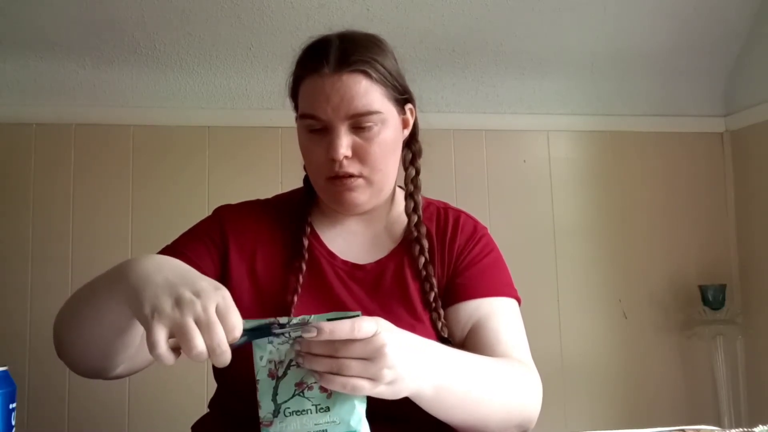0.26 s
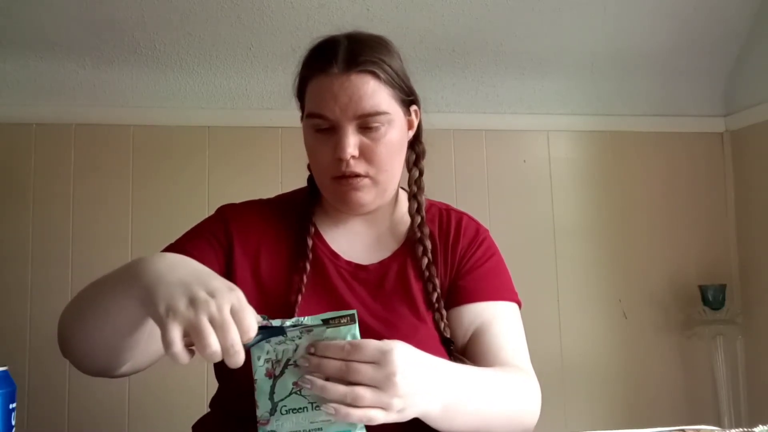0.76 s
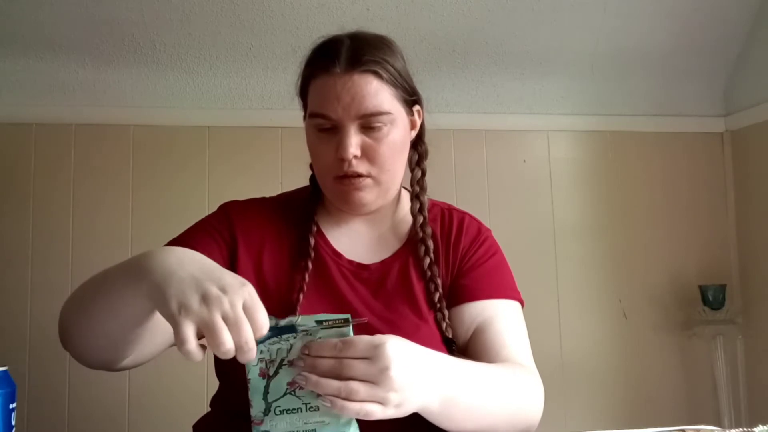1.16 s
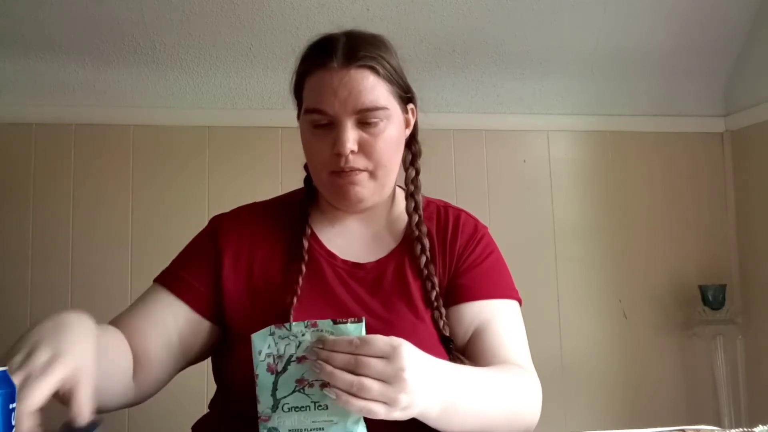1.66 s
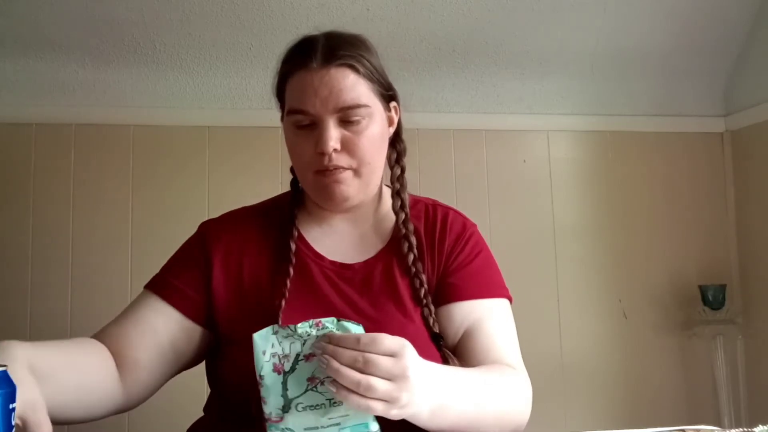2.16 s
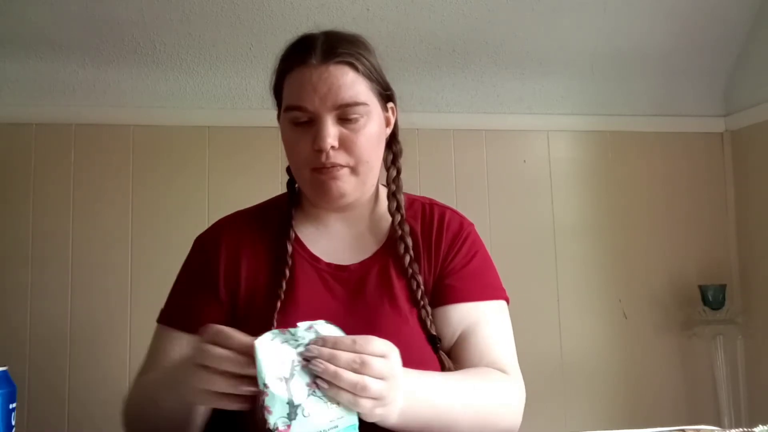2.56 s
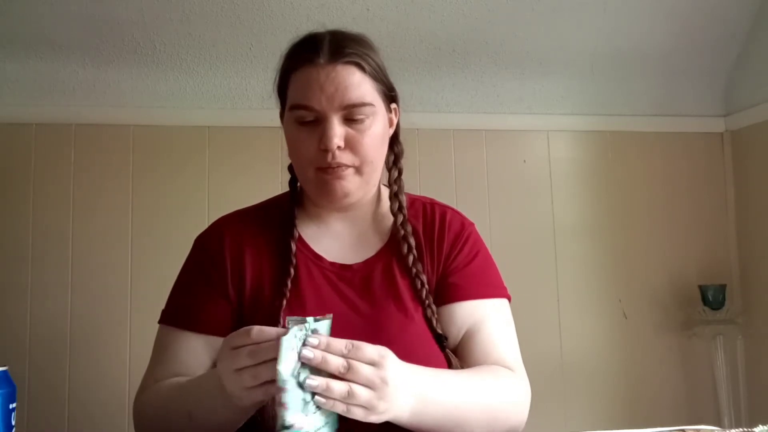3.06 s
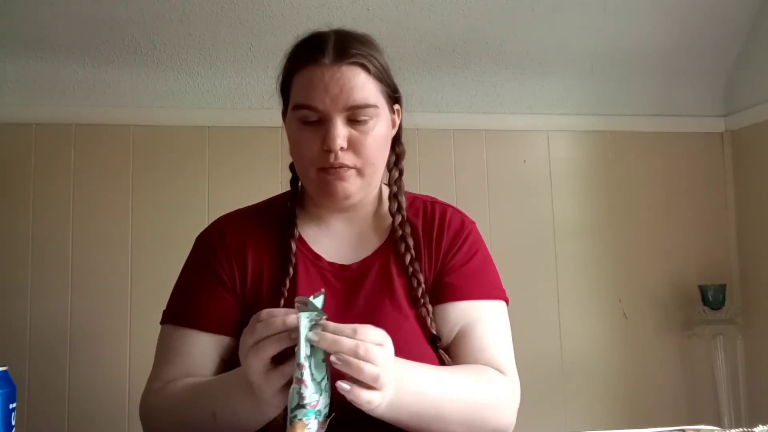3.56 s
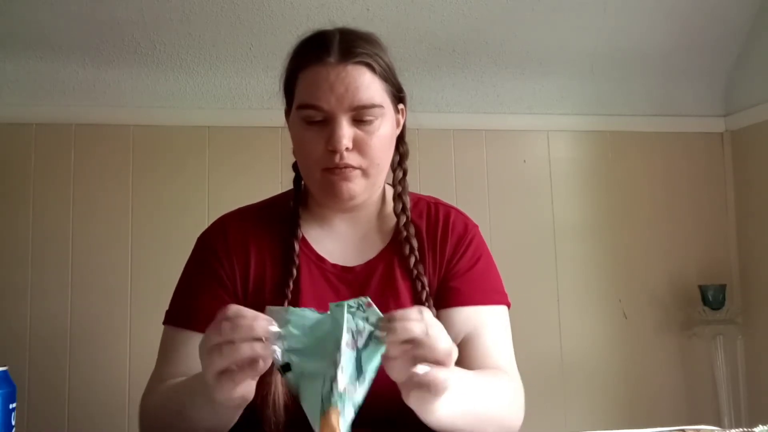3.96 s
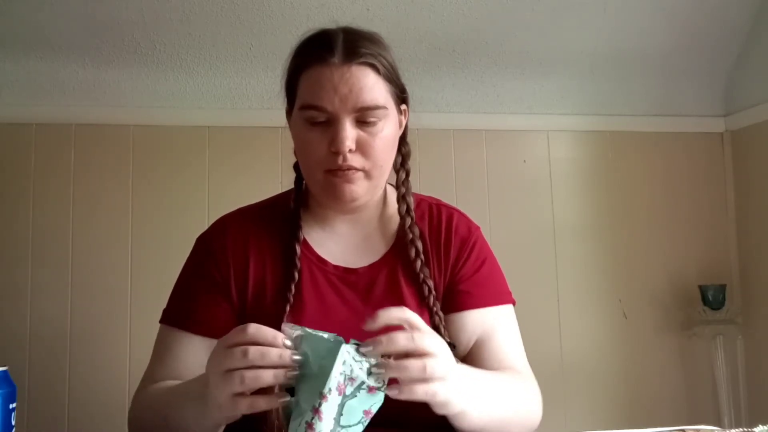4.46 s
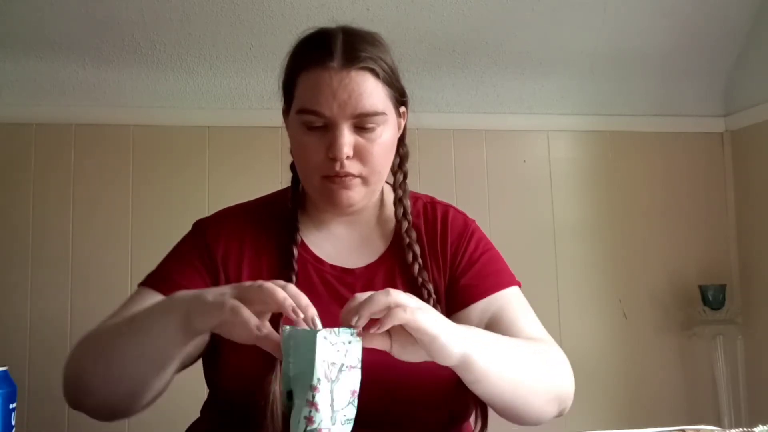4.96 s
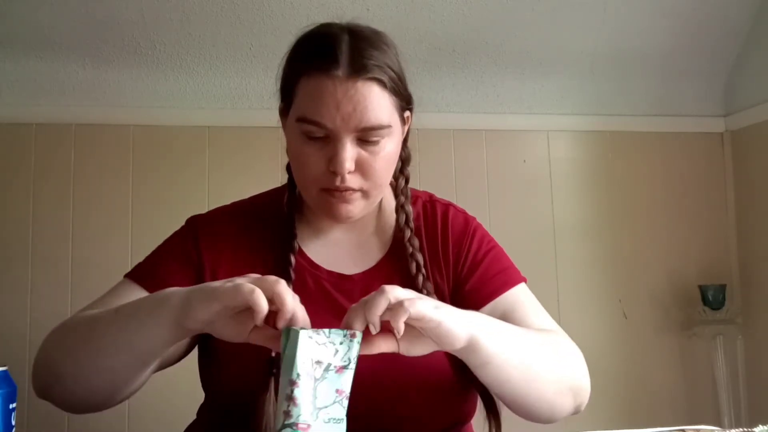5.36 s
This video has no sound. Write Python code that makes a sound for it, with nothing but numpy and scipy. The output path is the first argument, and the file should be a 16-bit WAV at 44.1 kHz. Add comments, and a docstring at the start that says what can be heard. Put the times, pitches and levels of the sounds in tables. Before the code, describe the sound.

Close stereo pickup of a crisp snack-type pouch being opened at a table. First come scattered dry snaps and fine rustle from cutting, then a dull thump and rattle as scissors land and settle. Bright crinkling follows, strongest around four seconds, easing, then picking up again in sharp snaps with hollow little pops. Short dense room reflections and a nearly silent steady noise floor.

```python
"""A stiff plastic pouch is snipped open and pulled apart in short squeezes; in between, scissors land on a table.
Creases in the film buckle in loud snaps over a crackle of tiny ones: filtered noise bursts, each with a hollow pop.
The scissors are a knock, made of fading sine waves, and a clack of the blades, made of short noise.
A small room answers with dense echoes, over faint steady air noise.
"""
import sys
import numpy as np
from scipy import signal
from scipy.fft import rfft, irfft
from scipy.io import wavfile
from scipy.ndimage import uniform_filter1d

SR = 44100
rng = np.random.default_rng(int(sys.argv[2]) if len(sys.argv) > 2 else 0)


def to_wav(s):
    """Save 16-bit WAV."""
    ch = np.atleast_2d(s).T  # columns
    pcm = np.round(np.clip(ch, -1, 1) * 32767)  # PCM
    wavfile.write(sys.argv[1], SR, pcm.astype(np.int16))


N = 247401  # length in samples
SNAP_SIZE = 2048  # samples in one snap or pop
SNAP_S = 0.003  # reference length that turns a level into the energy of a click, s
EARLY_S = 0.0015  # each burst is placed this much early, so that its sharp step falls on time, s

# Loud creases, one row a snap. Levels are before the common offsets in snaps().
# Columns: t/s, level/dB, centre of the ring f/Hz, push on the pouch relative to the snap level/dB,
# left minus right level/dB (limited to 10 either way)
CREASE_SNAPS = [(0.227, -32, 3550, -9, 0), (0.2523, -36.5, 4800, -6.5, 5), (0.3511, -35.5, 4470, -30, -1),
                (0.3926, -30, 4050, -1, 2), (0.3967, -31, 4230, -5, -5), (0.4083, -33, 5470, -22, -5),
                (0.547, -60, 2120, -2, 1), (0.6164, -31.5, 2300, -23, 3.5), (0.6376, -33.5, 1730, -6, -3),
                (0.7182, -35.5, 2340, 1.5, 4), (0.76, -30, 3280, -8.5, 10), (0.8027, -38, 2750, 3.5, 4),
                (0.9676, -30, 5250, -16.5, 0.5), (1.028, -40.5, 2940, 1, 1), (1.119, -25, 4800, -5, -3),
                (1.131, -40, 3890, 3.5, -3), (1.1437, -29, 3600, -2, 4), (1.1485, -23, 4630, -39, 4),
                (1.2216, -29, 5500, -23, 1), (1.372, -44, 5500, 6, 0), (1.392, -26.5, 4600, -29, 5.5),
                (1.427, -38.5, 4100, -22, 3), (1.5878, -46, 7600, -34, 3), (1.6532, -36, 4680, -9, 12),
                (1.7047, -38, 3950, -7, -1), (1.7255, -35.5, 4900, -5, -3), (1.7468, -24.5, 4870, -12, 1),
                (1.7643, -26.5, 5200, -32, -3), (1.815, -28.5, 6100, -32, -4), (1.8304, -29, 4770, -20, 4),
                (1.85, -28, 3100, -31, 6), (1.967, -34, 4460, 0, -3), (1.9781, -25, 3640, -7, 0),
                (2.0016, -27.5, 3420, -26, 4), (2.014, -29.5, 3330, -18, -4), (2.127, -38, 6200, -32, -11),
                (2.4678, -49, 11000, -27, 8), (2.476, -25, 6460, -23, -13), (2.637, -30.5, 2680, -10, -8),
                (2.6414, -25.5, 2750, -9.5, 8), (2.6686, -30.5, 5500, -3, 3),
                (2.6859, -22.5, 5650, -16, -7), (2.7347, -30.5, 4380, -10, -4),
                (2.7526, -27, 5470, -26, -2), (2.83, -28.5, 4940, -6.5, 4), (2.8607, -34, 5860, -1, -6),
                (2.8844, -34, 3400, -7, -6), (2.9237, -54, 4030, -10, 3), (2.956, -32.5, 4760, -27, -8),
                (3.0215, -31, 4580, -1.5, 4), (3.0444, -26, 5570, -11.5, 5), (3.0674, -30, 6600, -17, 4),
                (3.077, -24.5, 4230, -20, 2), (3.1177, -26.5, 5300, -6, -13), (3.1584, -30, 4600, -8, 1),
                (3.2528, -36, 4140, 0, 6), (3.293, -25.5, 6500, -27, 2), (3.3969, -24, 4500, -35, -14),
                (3.42, -23, 4600, -6, -6), (3.53, -27.5, 8250, -22, -9), (3.538, -21.5, 4900, -37, 1.5),
                (3.6423, -26, 5870, -8, 2), (3.6729, -26, 7900, -25, 2), (3.6949, -22.5, 4900, -27, -2),
                (3.7217, -22.5, 5230, -6.5, 4), (3.747, -21, 5100, -32, 6), (3.7693, -25, 4900, -16, -4),
                (3.799, -26.5, 6800, -25, 2), (3.8322, -25.5, 4700, -18, 4), (3.885, -24.5, 5070, -36, -6),
                (3.9, -31, 4270, -15, 8), (3.9234, -21, 4560, -11.5, -3), (3.9388, -19, 5100, -19, -5),
                (3.974, -21.5, 4900, -2.5, -13), (3.987, -20.5, 5650, -12, 10),
                (4.0259, -25.5, 3920, -11, 1), (4.042, -24.5, 5140, -29, 3), (4.0809, -27, 5250, -11, -14),
                (4.1388, -29.5, 3780, -26, -13), (4.2195, -30.5, 4360, -4, -3),
                (4.2955, -33, 4900, -22, -4), (4.327, -23, 3680, -5.5, 4), (4.3863, -32.5, 3220, -17, 0),
                (4.4042, -28, 7400, -2.5, 4), (4.421, -25, 5450, -10.5, -2), (4.448, -20, 3650, -22, 11),
                (4.4636, -29, 3600, -1.5, 1), (4.5858, -41, 2000, -24, 1), (4.6347, -31, 3870, -3.5, 4),
                (4.686, -40, 4870, -7, -1), (4.7238, -36, 3380, 0, 1), (4.7309, -32.5, 2500, -1.5, 4),
                (4.7819, -29.5, 2770, -6.5, -2), (4.815, -31.5, 4900, -6, -8),
                (4.8213, -21, 4460, -2.5, -3.5), (4.8417, -28.5, 5350, -4, 7), (4.873, -27.5, 3170, 1.5, 0),
                (4.942, -29.5, 2140, -1.5, -6), (4.946, -29, 4600, -3.5, 7), (4.971, -23, 3770, -16, -7),
                (4.992, -26.5, 3840, -21, 5), (5.0191, -31.5, 5160, -2, 9), (5.075, -29.5, 4450, 0.5, 0),
                (5.086, -25, 4760, -20, -15), (5.2034, -31.5, 3180, -9, -1), (5.228, -32, 6900, -16, 14),
                (5.2848, -31.5, 1900, 0, 1), (5.3279, -24.5, 6200, -4.5, -1), (5.376, -20.5, 3650, -2.5, 3),
                (5.39, -27, 4700, -30, -9), (5.4584, -24, 3700, -15, -6), (5.4691, -22, 3950, -6, 13),
                (5.5229, -25, 4270, -17, 9), (5.5363, -33, 3550, -20, 2), (5.5513, -19.5, 2480, -4.5, 0),
                (5.5846, -21, 2390, -16, 2), (5.59, -28.5, 3040, -1, -14)]


def snaps(film_db=1, body_db=-1.5, spread_db=-2.5, beam_db=4, ripple=0.12, pull=0.61,
          typical_hz=4200, wide_growth=0.15, typical_db=-24):
    """Loud creases one by one: what goes straight to the two ports, and what spreads to the walls."""
    straight, spread = np.zeros((2, 2, N))
    for s, db, ring_hz, push_db, pan_db in CREASE_SNAPS:
        strength = amp(db) * np.sqrt(SNAP_S * SR)
        half_pan = np.array([[0.5], [-0.5]])
        sides = unit(amp(np.clip(pan_db, -10, 10) * half_pan))
        # high-pitched facets beam their sound forward
        octaves_up = np.log2(ring_hz / typical_hz)
        beam = amp(film_db + beam_db * max(octaves_up, 0))
        add(straight, s - EARLY_S, strength * beam * sides * crease(ring_hz))

        # weaker snaps sound drier: their film sound sends relatively less to the room
        wide = amp(spread_db + wide_growth * min(db - typical_db, 0))
        # summed over all directions, the colour of a facet evens out
        wide_hz = typical_hz * (ring_hz / typical_hz) ** pull
        add(spread, s - EARLY_S, strength * wide * crease(wide_hz, ripple))

        pop = strength * amp(push_db + body_db) * push()
        add(straight, s, pop)
        add(spread, s, pop)
    return straight, spread


# Basic colour of a buckling crease.
# Columns: f/Hz, level/dB
FILM_COLOUR = [(300, -54), (800, -6.5), (1300, -2.5), (2000, -1), (3400, -5), (4800, -6.5), (6400, -3.5),
               (7200, -7), (8200, -11.5), (10500, -10), (13500, -17.5), (15000, -9.5), (15800, -12),
               (16800, -60)]
SCATTER_S, FLUTTER = 0.0009, 0.45  # fade of the first waves in s; strength of the later ones


def crease(ring_hz, ripple=1, scatter=1.48, flutter_s=0.0096, rise=0.68, rise_s=0.0012, focus_db=5,
           lean_db=3.0, facet_db=4.5, peak_db=3.0, size=66):
    """A brief rise of noise softens the attack, then a sharp step and fading noise, different at each port."""
    t = (np.arange(SNAP_SIZE) - size) / SR  # the step comes after "size" samples
    hz = np.fft.rfftfreq(SNAP_SIZE, 1 / SR)
    before, early, late = rng.standard_normal((3, 2, SNAP_SIZE))
    waves = rise * unit(before * (t < 0) * np.exp(-abs(t) / rise_s))
    waves += scatter * unit(early * (t >= 0) * np.exp(-abs(t) / SCATTER_S))
    waves += FLUTTER * unit(late * (t >= 0) * np.exp(-abs(t) / flutter_s))
    # every facet has its own size, and so its own broad resonances
    facet = np.interp(hz, np.linspace(0, SR / 2, 32), rng.standard_normal(32))
    octaves = np.log2((hz + 1) / ring_hz)
    focus = np.hypot(octaves, 0.4)
    peak = np.exp(-(octaves / 0.22) ** 2)
    # small facets lean to the treble, large ones to the mids
    lean = np.log2(ring_hz / 4400) * np.log2(np.maximum(hz, 1200) / 4400)
    gain_db = read(FILM_COLOUR, hz) - focus_db * focus + lean_db * lean
    gain_db = gain_db + ripple * (facet_db * facet + peak_db * peak)
    step = t == 0
    return unit(colour(step + ripple * waves, gain_db))


# Colour of the hollow pouch.
# Columns: f/Hz, level/dB
POUCH_COLOUR = [(30, -43), (85, -14.5), (120, -6.5), (165, -7), (215, -4), (290, -2.5), (420, 4.5),
                (560, 3), (670, 6), (800, -0.5), (1100, 2), (1600, -2.5), (4000, -75)]


def push(ring_s=0.0037, shake=1.2):
    """The wall of the pouch jumps with the crease, inwards or outwards: a short hollow pop."""
    t, hz = np.arange(SNAP_SIZE) / SR, np.fft.rfftfreq(SNAP_SIZE, 1 / SR)
    shaking = unit(rng.standard_normal(SNAP_SIZE) * np.exp(-t / ring_s))
    wall = (t == 0) + shake * shaking
    return rng.choice([-1, 1]) * unit(colour(wall, read(POUCH_COLOUR, hz)))


LEAD_S = 0.002  # time scale of the short noisy swell that leads into each snap, s


def crackle(film_db=0, body_db=0, per_s=300, usual_db=-40.0, rate_growth=0.33, spread_db=4.0, chain_db=-16,
            chain_push_db=-10, chain_growth=0.089, typical_db=-23, chain_s=0.009, count=96):
    """Swarms of tiny creases of very unequal size: harder work brings more, and so does every loud snap."""
    film_power, wall_power = effort()
    # a short noisy swell leads into each snap and a crackle fades after it, fainter around weak snaps
    chain, near = np.zeros((1, N)), np.arange(-SR // 50, SR // 20) / SR
    for at, db, *_ in CREASE_SNAPS:
        strength = amp(db + chain_db + chain_growth * (db - typical_db))
        fade_s = np.where(near < 0, LEAD_S, chain_s)
        add(chain, at + near[0], strength ** 2 * np.exp(-abs(near) / fade_s))
    work = np.sqrt(film_power + chain[0])
    wall_work = np.sqrt(wall_power + chain[0] * amp(chain_push_db) ** 2)
    hollow = amp(body_db) * wall_work / work

    rate = per_s * (work / amp(usual_db)) ** rate_growth  # tiny creases a second
    happens = rng.random(N) < rate / SR
    size = happens * amp(spread_db * np.minimum(rng.exponential(1, N), 4))
    # the creases share out the work of each moment
    local_power = abs(uniform_filter1d(size ** 2, size=1500))
    size *= work / np.sqrt(local_power + rate / SR * 0.089)

    # folds of all sizes give way side by side
    kind = rng.integers(0, count, N)
    folds = [(crease(hz, scatter=1.46, facet_db=3.5), push()) for hz in np.geomspace(2000, 6500, count)]
    out = np.zeros((2, N))
    for i in np.flatnonzero(size):
        film, wall = folds[kind[i]]
        add(out, i / SR - EARLY_S, size[i] * (amp(film_db) * film + hollow[i] * wall))
    return out


# Squeezes of the film by blades or fingers, one row each.
# Columns: start t/s, held for t/s, starting strength of the fine crackle level/dB,
# push on the pouch relative to that level/dB
FILM_SQUEEZES = [(0.0, 0.26, -49.5, -10.5), (0.167, 0.087, -41, -12), (0.344, 0.069, -44.5, -6),
                 (0.391, 0.05, -49.5, 0.5), (0.661, 0.1, -43.5, -6), (0.791, 0.039, -50.5, -3),
                 (0.856, 0.071, -43, -5), (0.98, 0.13, -51.5, -11), (1.15, 0.051, -43, -8),
                 (1.21, 0.045, -40.5, -4), (1.29, 0.18, -53, -1.5), (1.383, 0.054, -46.5, -1),
                 (1.597, 0.15, -55, -7), (1.651, 0.12, -54.5, 1), (1.748, 0.15, -53.5, 7),
                 (1.976, 0.024, -49.5, 7), (2.498, 0.038, -41, -11), (2.635, 0.17, -38, -6),
                 (2.79, 0.1, -40.5, -8.5), (2.88, 0.2, -43, -6), (3.019, 0.15, -37, -10.5),
                 (3.199, 0.19, -41.5, -12), (3.402, 0.052, -36.5, -6), (3.546, 0.11, -40, -7.5),
                 (3.69, 0.079, -30, -17), (3.78, 0.082, -36, -16), (3.89, 0.084, -27, -21.5),
                 (3.942, 0.032, -27.5, -8), (4.008, 0.1, -40, -2.5), (4.329, 0.029, -38, -6),
                 (4.425, 0.016, -34.5, -2.5), (4.644, 0.095, -53, 0), (4.829, 0.052, -39, -5.5),
                 (4.953, 0.021, -32, -1.5), (5.0, 0.029, -37, -20), (5.072, 0.046, -37, -13),
                 (5.186, 0.058, -45, -6.5), (5.326, 0.092, -37, -12), (5.46, 0.063, -34, -7),
                 (5.549, 0.029, -36, -3)]
# a squeeze takes hold quickly, eases a little all along, and lets go
GRIP_S, EASE_DB_PER_S, LET_GO_S = 0.0057, 9, 0.01
# the film never lies quite still: steady crackle strength in dB, and its push relative to that in dB
HELD_DB, HELD_PUSH_DB = -68, 2.5


def effort():
    """Power of the fine crackle, and of its push on the pouch: each squeeze is attack, hold and release."""
    t = np.arange(N) / SR
    film = np.full(N, amp(HELD_DB) ** 2)
    wall = np.full(N, amp(HELD_DB + HELD_PUSH_DB) ** 2)
    for start, held, db, push_db in FILM_SQUEEZES:
        age = np.maximum(t - start, 0)
        attack = np.minimum(age / GRIP_S, 1)
        release = np.exp(-np.maximum(age - held, 0) / LET_GO_S)
        power = (attack * release * amp(db - EASE_DB_PER_S * age)) ** 2
        film = film + power
        wall = wall + power * amp(push_db) ** 2
    return film, wall


# The scissors land on the table, slip and settle: one row a knock, also used by blades().
# Columns: t/s, level/dB, centre of the blow f/Hz, clack of the blades relative to the knock level/dB
# (before the offset in blades()), centre of the clack f/Hz
SCISSOR_KNOCKS = [(2.1707, -23, 186, -15, 7500), (2.1715, -37, 1560, 0, 1960), (2.188, -27, 255, -31, 7000),
                  (2.2213, -31, 212, -3, 4260), (2.2679, -34, 215, -1.5, 1940),
                  (2.289, -55, 800, 19.5, 2250), (2.3139, -36, 197, -4.5, 4600),
                  (2.3359, -30, 760, 2.5, 5100), (2.349, -27, 264, -24, 5000), (2.391, -36, 175, -9, 3980),
                  (2.4133, -42, 200, 3, 3500)]
# Ringing modes of the table top, before each knock varies them a little.
# Columns: f/Hz, level/dB, time to fade by 60 dB t/s
TABLE_MODES = [(106.8, 3, 0.48), (148, -0.5, 0.2), (168, 5.5, 0.096), (233, -3, 0.17), (280, -1.5, 0.075),
               (332, 1, 0.062), (483.7, 4, 0.081), (566, -5, 0.15), (717, 9.5, .12), (837, 4.5, 0.13),
               (920, 2, 0.11), (1120, -3.5, 0.1), (1345, 7, 0.089), (1740, 4, 0.11), (1947, 8.5, 0.096)]


def scissors(level_db=0, reach_db=10, lowest_hz=105, spot_db=4.0, detune=0.0364):
    """The handles knock on the table: sine modes ring and fade, loudest near the pitch of the blow."""
    out, t = np.zeros((2, N)), np.arange(SR // 2) / SR
    hz, mode_db, t60 = np.transpose(TABLE_MODES)[:, :, None]
    facing = (-1) ** np.arange(len(hz))[:, None]  # neighbouring modes swing in opposite senses
    for s, db, blow_hz, *_ in SCISSOR_KNOCKS:
        # each knock lands on another spot and loads the top differently
        spot, load = rng.standard_normal((2, len(hz), 1))
        distance = abs(np.log2(hz / blow_hz))  # octaves from the blow
        weight = facing * amp(mode_db + spot_db * spot - reach_db * distance)
        weight = weight / np.linalg.norm(weight)
        tones = np.sin(2 * np.pi * hz * (1 + detune * load) * t)
        ring = (weight * amp(-60 * t / t60) * tones).sum(0)
        add(out, s, amp(db + level_db) * ring)
    # the table top radiates almost no deep bass
    highpass = signal.butter(N=2, Wn=lowest_hz, btype="highpass", fs=SR, output="sos")
    return signal.sosfilt(highpass.repeat(2, 0), out)  # every stage runs twice, for a steeper cut


def blades(level_db=-2, clack_s=0.002, focus_db=9, zing_db=-12, zing_s=0.02):
    """At each knock the loose blades clack, and the steel rings on briefly: two fading noises, filtered."""
    out, t, hz = np.zeros((2, N)), np.arange(SR // 4) / SR, np.fft.rfftfreq(SR // 4, 1 / SR)
    for s, db, _, clack_db, clack_hz in SCISSOR_KNOCKS:
        contact, steel = rng.standard_normal((2, 2, len(t)))
        clack = unit(contact * np.exp(-t / clack_s))
        clack = clack + amp(zing_db) * unit(steel * np.exp(-t / zing_s))
        octaves = np.log2((hz + 1) / clack_hz)
        clack = unit(colour(clack, -focus_db * octaves ** 2 / np.hypot(octaves, 0.5)))
        add(out, s, amp(db + clack_db + level_db) * np.sqrt(SNAP_S * SR) * clack)
    return out


def room(x, turn_s=0.035, count=4):
    """The sound fades in turn between four random echo patterns, so no fixed colour lasts."""
    place, out = np.arange(N) / SR / turn_s, np.zeros((2, N))
    for k in range(count):
        distance = abs((place - k + 1) % count - 1)
        share = np.cos(np.pi / 2 * np.minimum(distance, 1))
        sent = share * (x.mean(0) + x) / 2
        out += signal.oaconvolve(sent, echoes(), axes=1)[:, :N]
    return out


# How fast the echoes die. Columns: f/Hz, time to fade by 60 dB t/s
ECHO_FADE = [(150, 0.25), (500, 0.24), (1400, 0.32), (4000, 0.24), (7000, 0.19), (14000, 0.22)]
# How strongly the room answers. Columns: f/Hz, level/dB
ECHO_LEVEL = [(150, 6.5), (600, -0.86), (2500, 0.7), (6000, 3), (14000, 5)]
# How alike the echoes are on the left and right. Columns: f/Hz, likeness (1 same, 0 unrelated, below 0 opposed)
ECHO_LIKENESS = [(150, 0.64), (500, 0.86), (1000, 0.11), (2000, 0.38), (4000, 0.27), (16000, -0.3)]
FIRST_ECHO_S = 0.0058  # delay before the echoes begin to build up, s


def echoes(build_s=0.00052):
    """Dense random wall echoes, most alike at both ports in the bass, each band dying at its own speed."""
    time = np.arange(SR // 2) / SR
    taps = rng.standard_normal((2, len(time))) * (rng.random((2, len(time))) < 0.12)
    taps *= 1 - np.exp(-np.maximum(time - FIRST_ECHO_S, 0) / build_s)
    hz, t, (a, b) = signal.stft(taps / taps.std(), SR, nperseg=256)
    same = np.clip(read(ECHO_LIKENESS, hz), -1, 1)[:, None]
    t60 = read(ECHO_FADE, hz)[:, None]
    fade_db = read(ECHO_LEVEL, hz)[:, None] - 60 * (t - FIRST_ECHO_S - build_s) / t60
    # the last factor gives slow and fast fades the same energy
    decay = amp(fade_db) * np.sqrt(np.log(10 ** 6) / (t60 * SR))
    right = same * a + np.sqrt(1 - same ** 2) * b
    return signal.istft(np.array([a, right]) * decay, SR, nperseg=256)[1]


# Colour of the background air, before its overall level is set.
# Columns: f/Hz, level/dB
AIR_COLOUR = [(25, -1), (120, -1), (400, -10), (1200, -25), (3000, -12.5), (8000, -43), (16000, -44)]


def air(level_db=-64):
    """Faint steady background of the room: filtered noise, partly shared by left and right."""
    noise = rng.standard_normal((2, N)) + rng.standard_normal(N)
    gain = amp(read(AIR_COLOUR, np.fft.rfftfreq(N, 1 / SR)))
    shaped = irfft(rfft(noise) * gain, N)
    return amp(level_db) * np.sqrt(N) * unit(shaped)


# Where the noise suppressor is half closed.
# Columns: f/Hz, level in one bin level/dB
QUIET_LEVEL = [(100, -52), (500, -65), (2000, -69), (6000, -84), (9000, -74.5), (16000, -66.5)]


def suppress(x, depth_db=-9):
    """Noise suppressor: bands that fall near silence are turned down, which shortens the tails."""
    hz, _, z = signal.stft(x, SR, nperseg=512, noverlap=384)
    power = (abs(z) ** 2).mean(0)
    power = uniform_filter1d(power, size=5, axis=0)  # smooth over frequency
    power = abs(uniform_filter1d(power, size=3, axis=1))  # smooth over time
    opened = power / (power + amp(read(QUIET_LEVEL, hz))[:, None] ** 2)
    return signal.istft(z * amp(depth_db * (1 - opened)), SR, nperseg=512, noverlap=384)[1][:, :N]


def amp(db):
    """Decibels to gain."""
    return 10 ** (np.asarray(db) / 20)


def unit(x):
    """Scales to energy 1 a channel, on average."""
    return x / np.sqrt(np.mean(np.sum(x ** 2, -1)) + 1e-20)


def read(points, hz):
    """Reads a table between its points, on a log-frequency axis."""
    f, value = np.transpose(points)
    return np.interp(np.log(hz + 1), np.log(f), value)


def add(mix, s, sound):
    """Mixes a sound in at time s, in seconds."""
    part = mix[:, max(round(s * SR), 0):][:, :sound.shape[-1]]
    part += sound[..., :part.shape[1]]


def colour(x, gain_db):
    """Filter with the given dB at each bin that acts only forward in time: attacks stay sharp."""
    log_gain = np.log(amp(np.maximum(gain_db, gain_db.max() - 80)))
    circle = np.r_[log_gain, log_gain[-2:0:-1]]  # the gain and its mirror image
    response = np.exp(np.conj(signal.hilbert(circle)))[:len(log_gain)]
    return irfft(rfft(x) * response)


def scene(pouch_room_db=0.16, table_room_db=-9, blade_room_db=0):
    """Pouch and scissors, their echoes in the room, and the air."""
    straight, spread = snaps()
    fine = crackle()
    table = scissors()
    steel = blades()
    pouch_sent = amp(pouch_room_db) * (spread + fine)
    walls = room(pouch_sent + amp(table_room_db) * table + amp(blade_room_db) * steel)
    return straight + fine + table + steel + walls + air()


# Tilt between the two microphone ports.
# Columns: f/Hz, left minus right level/dB
PORT_TILT = [(150, -0.5), (600, 1.5), (2200, 0.5), (4400, -2), (6300, -4.5), (8500, 2.5), (15000, 6)]
EDGE_HZ = 16500  # top of the band that is kept


def record(dry):
    """Each port has its own colour; then come the noise suppressor and the band limit."""
    tilt_db = read(PORT_TILT, np.fft.rfftfreq(N, 1 / SR))
    tilted = irfft(rfft(dry) * amp([tilt_db / 2, -tilt_db / 2]), N)
    heard = suppress(tilted)
    lowpass = signal.firwin(255, EDGE_HZ, window=("kaiser", 9), fs=SR)
    return signal.oaconvolve(heard, lowpass[None], "same")


dry = scene()
out = record(dry)
to_wav(out)
```